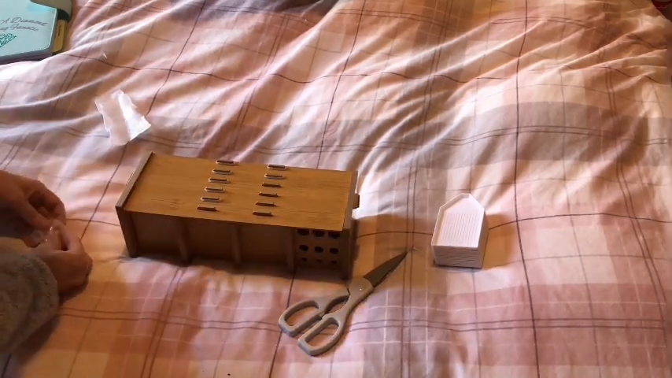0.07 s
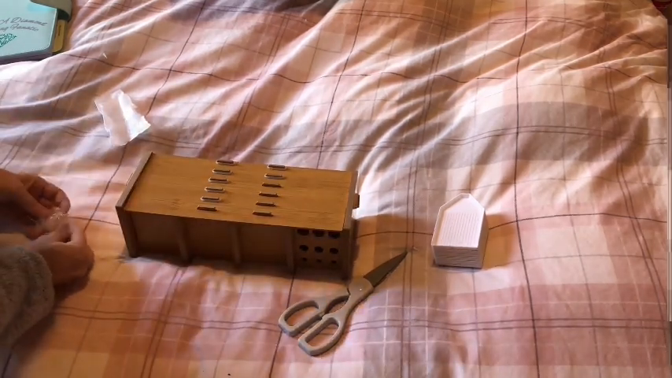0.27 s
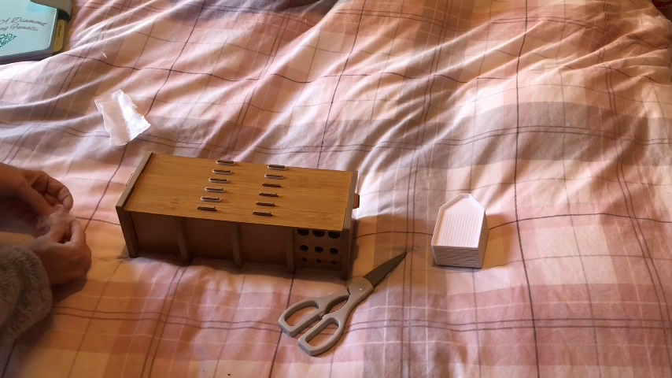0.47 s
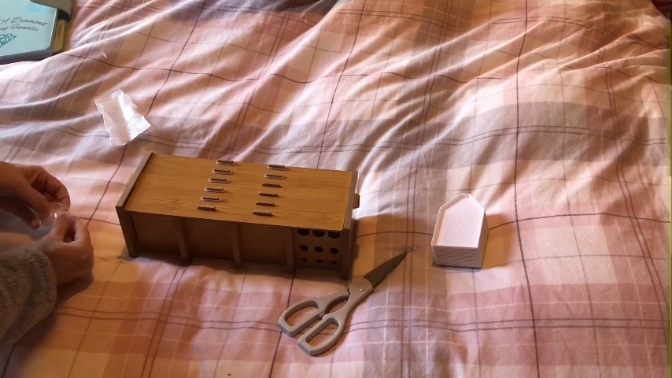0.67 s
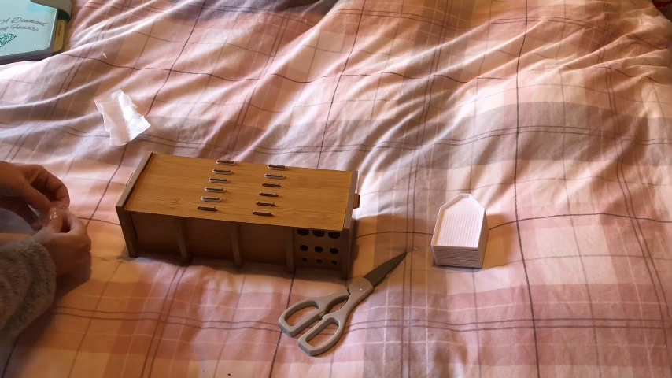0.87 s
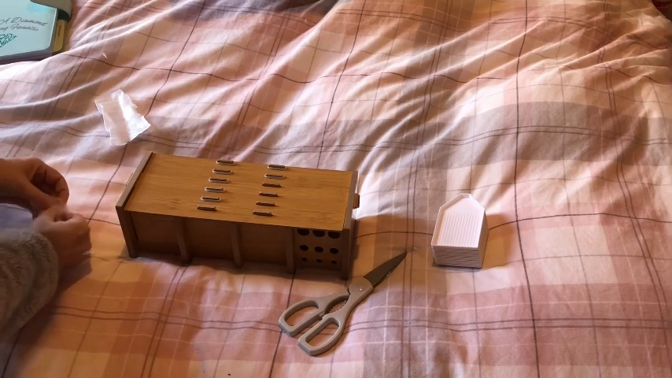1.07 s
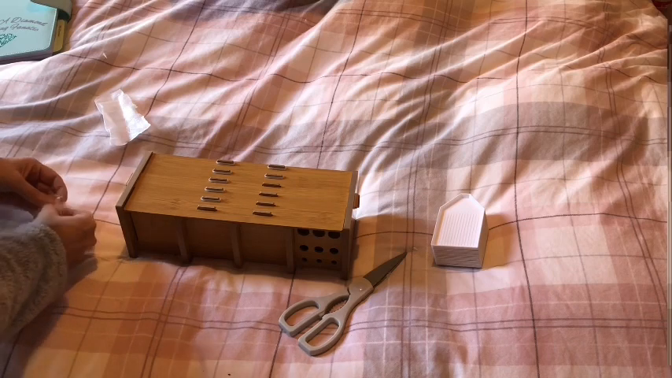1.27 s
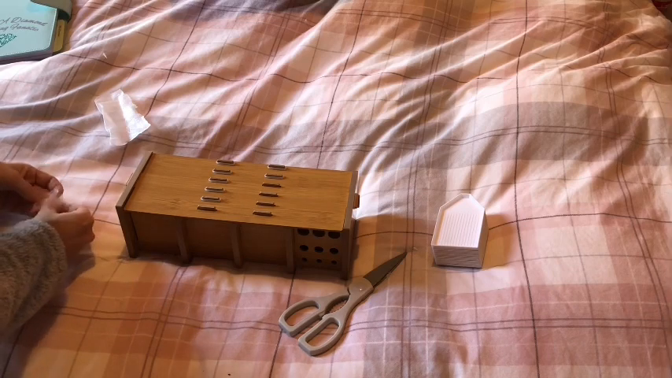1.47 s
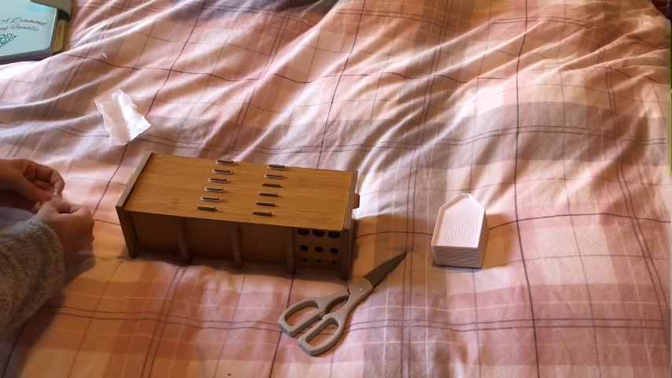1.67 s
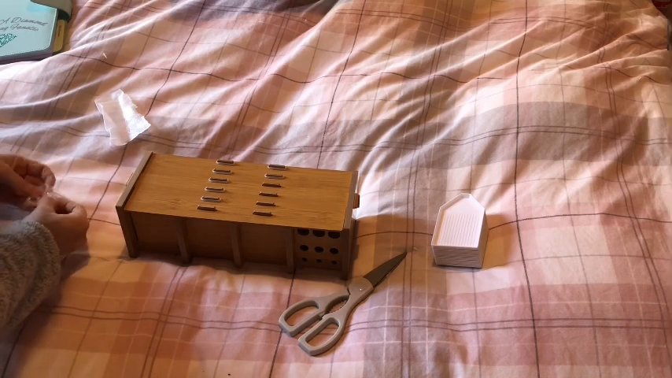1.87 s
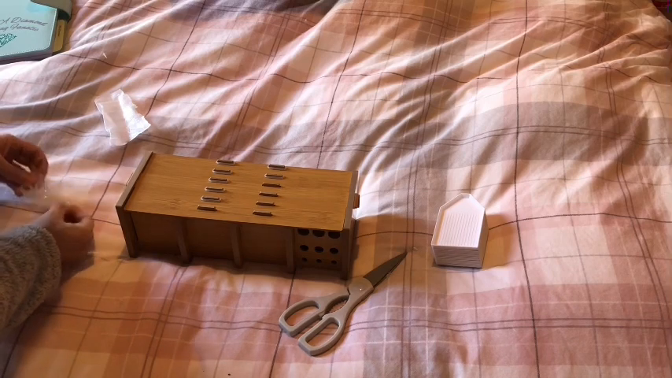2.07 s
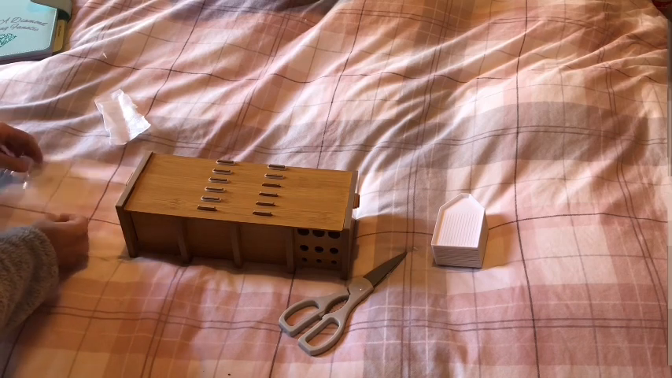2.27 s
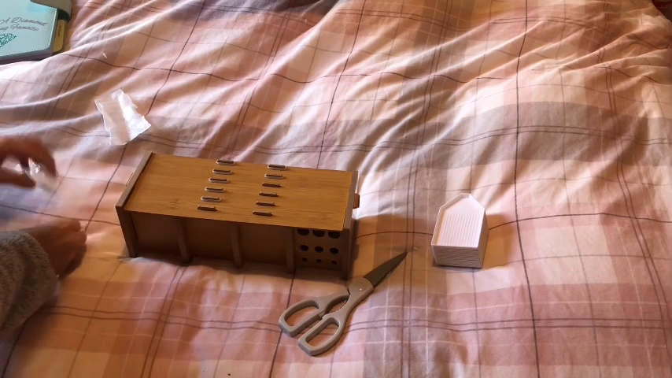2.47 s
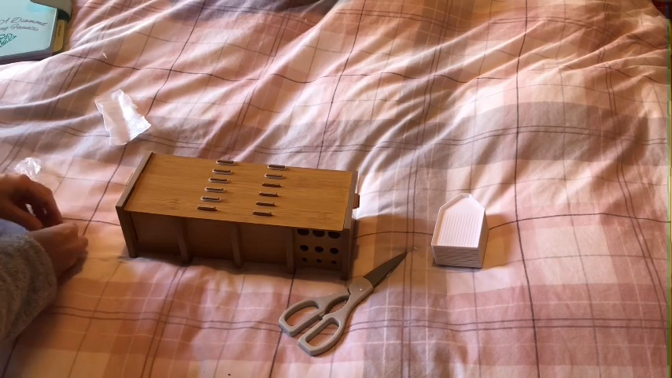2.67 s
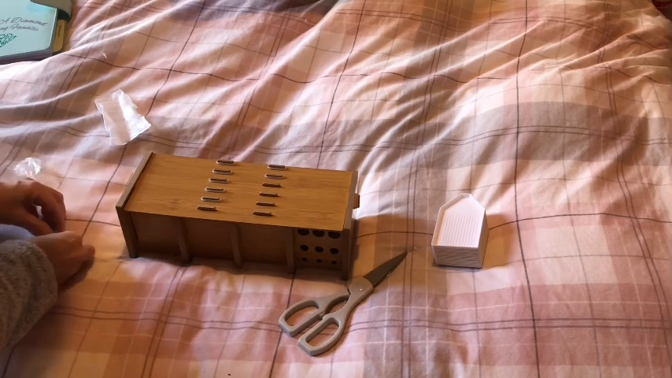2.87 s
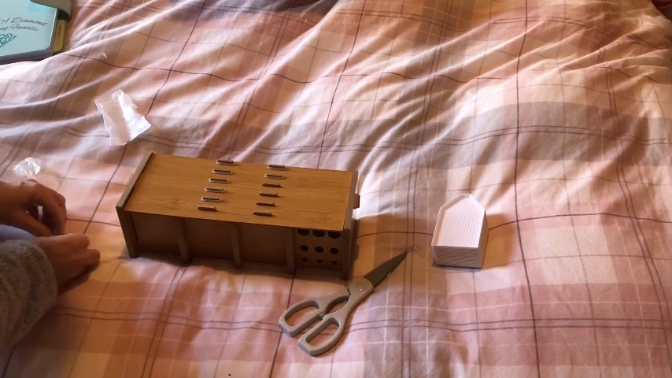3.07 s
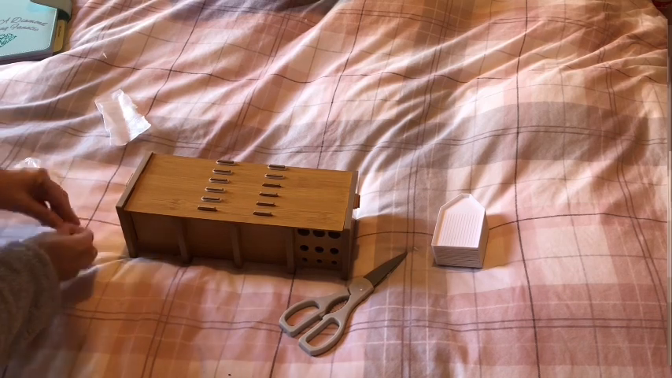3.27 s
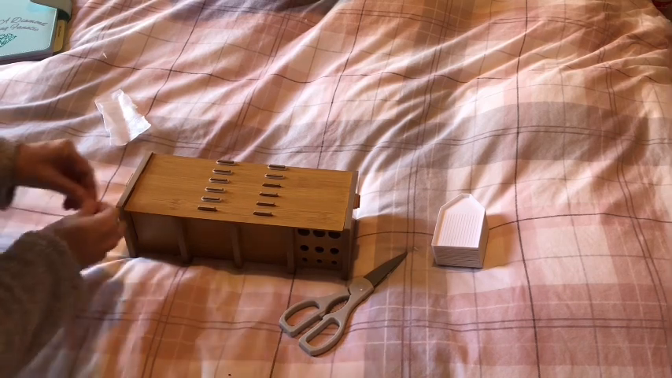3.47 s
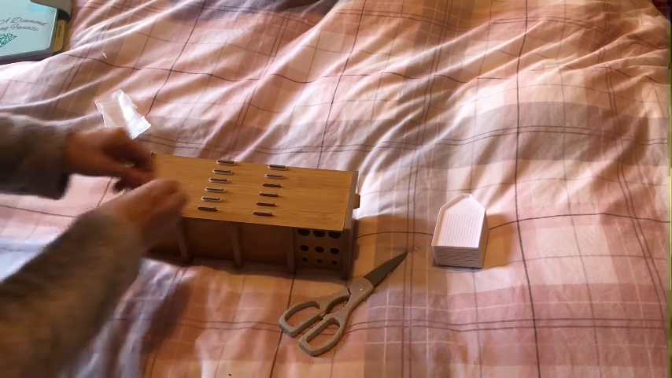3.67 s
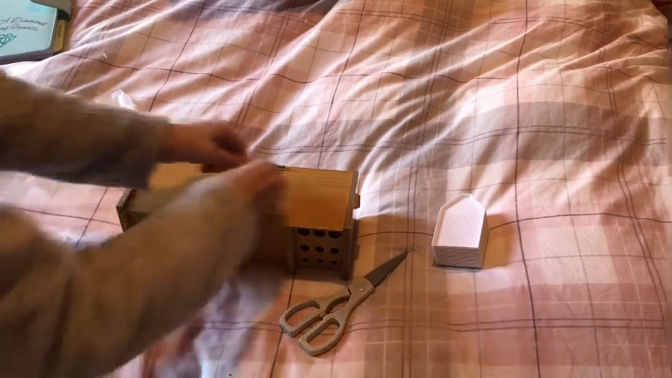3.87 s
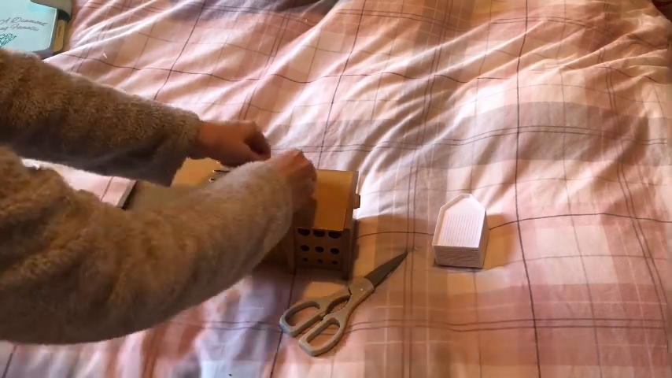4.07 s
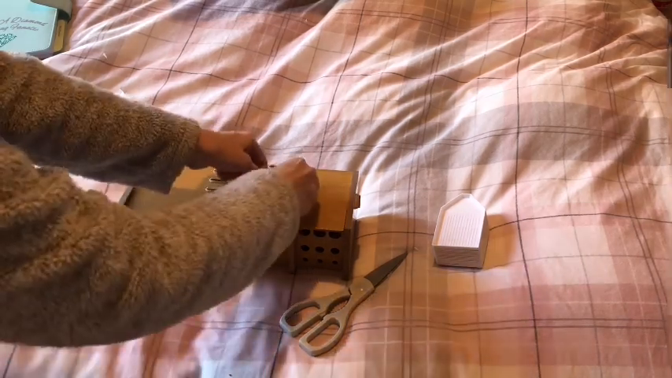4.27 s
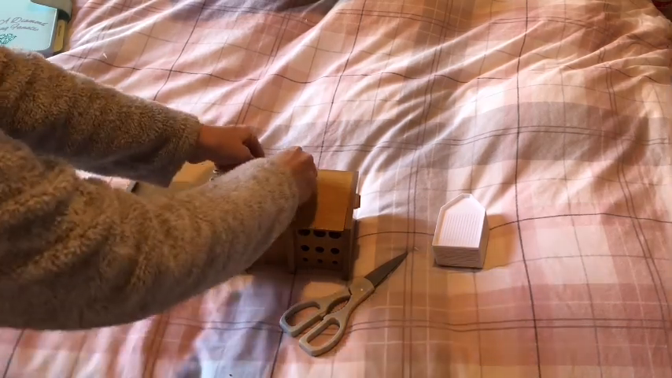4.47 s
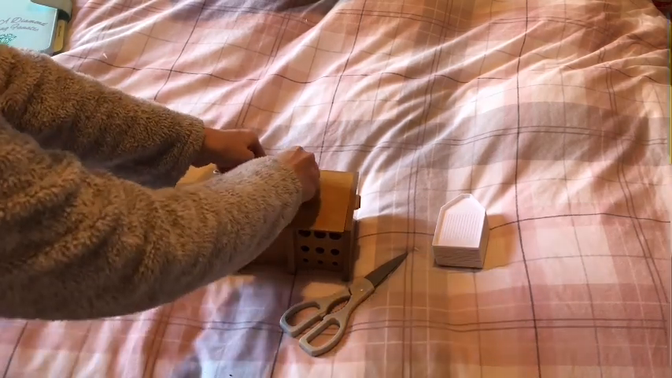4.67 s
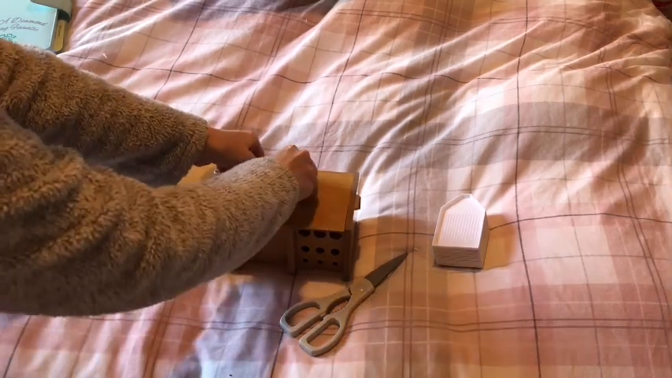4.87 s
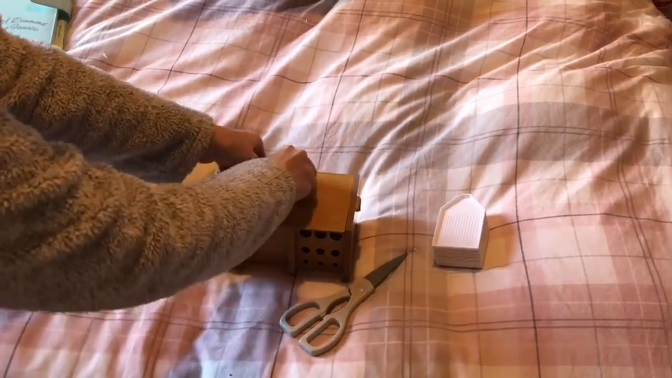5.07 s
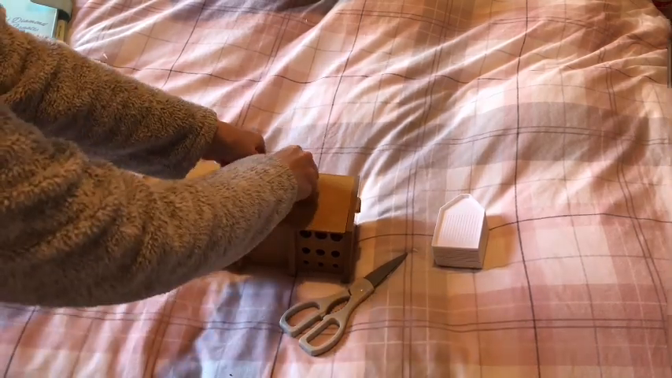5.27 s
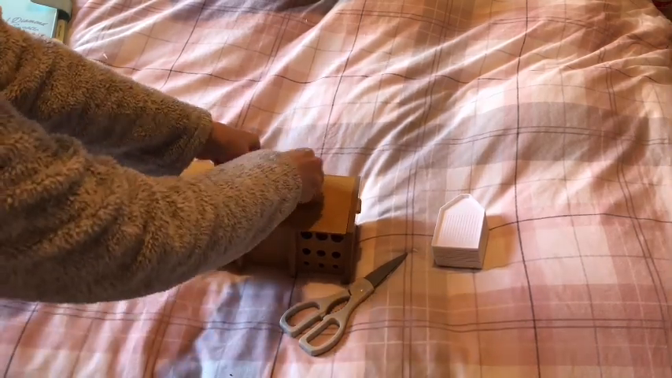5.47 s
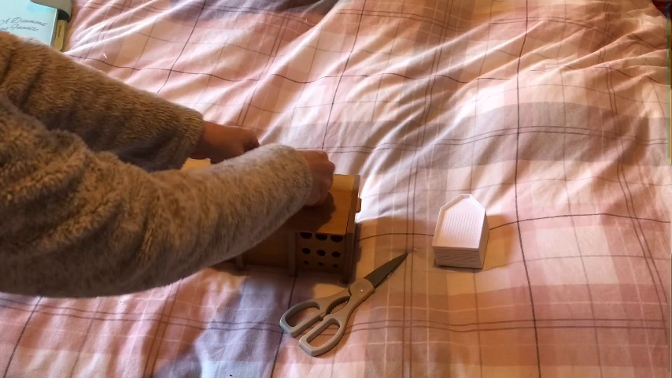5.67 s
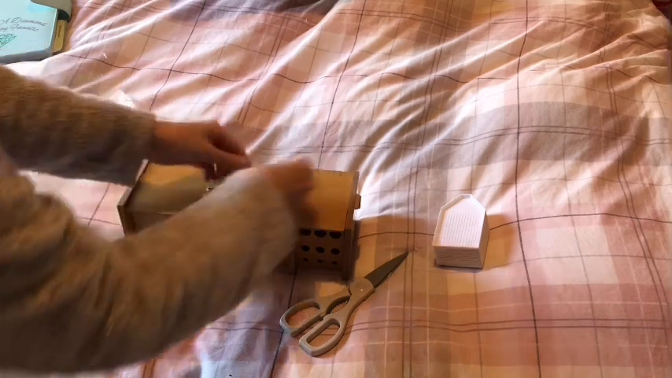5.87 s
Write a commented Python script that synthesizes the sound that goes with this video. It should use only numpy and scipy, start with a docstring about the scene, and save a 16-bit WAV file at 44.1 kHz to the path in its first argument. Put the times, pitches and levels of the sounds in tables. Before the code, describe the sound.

A thin plastic bag crackles sharply in a quiet bedroom, then after soft sleeve rustles and near silence a rubber band snaps hard on wood.

```python
"""In a faintly humming bedroom, hands first crumple a thin plastic bag on a bed: snapping creases
over a crackle of many small ticks. Soft knocks on a small plywood box begin, and wool sleeves brush the
cotton sheet with soft noise. Last, a rubber band stretched over the box slaps the wood and rattles against
it in several quick contacts, with a low twang and dull knocks after: short bursts of force that set off
the ringing of box and band. Bag and box echo in the room."""
import sys
import numpy as np
from scipy import signal
from scipy.fft import rfft, irfft
from scipy.io import wavfile
from scipy.ndimage import uniform_filter1d

SR = 44100
rng = np.random.default_rng(int(sys.argv[2]) if len(sys.argv) > 2 else 0)


def store_wav(level_fs):
    """Save 16-bit WAV to argv[1]."""
    pcm = np.round(np.clip(np.atleast_2d(level_fs), -1, 1) * 32767)
    wavfile.write(sys.argv[1], SR, pcm.T.astype(np.int16))


N = 261601  # length of the scene in samples


def gain_of(db):
    """Turns dB into a factor for the amplitude."""
    return 10 ** (np.asarray(db) / 20)


def evened(x):
    """Scales x to rms 1."""
    return x / np.sqrt(np.mean(x ** 2) + 1e-20)


def read(points, hz):
    """Reads a curve between its points, along a logarithmic frequency axis."""
    f, value = np.transpose(points)
    return np.interp(np.log(hz + 1), np.log(f + 1), value)


def add(mix, s, sound):
    """Adds a sound to the mix, starting at s seconds."""
    part = mix[round(s * SR):][:len(sound)]
    part += sound[:len(part)]


def coloured(x, spectrum):
    """Filters x by the dB curve, then scales it to rms 1."""
    hz = np.fft.rfftfreq(len(x), 1 / SR)
    return evened(irfft(rfft(x) * gain_of(read(spectrum, hz)), len(x)))


def ring(hz, cycles, phase, size=256):
    """A ring that grows for the given number of cycles and then dies away, peak near 1."""
    turns = np.arange(size) / SR * hz
    shape = turns / cycles * np.exp(1 - turns / cycles)
    return shape * np.sin(2 * np.pi * (turns + phase))


def tick(noise, ms):
    """A burst of noise with little bass, fading within about ms milliseconds, peak 1."""
    t = np.arange(len(noise) - 1) / SR
    less_bass = noise[1:] - .5 * noise[:-1]
    burst = less_bass * np.exp(-1000 * t / ms)
    return burst / abs(burst).max()


SWELL_DROP_DB = 12.5  # a swell lies this far under its peak one half length away


def swells(rows, order=2):
    """Gain at every sample: rounded swells whose powers add up, flatter on top for a higher order."""
    t = np.arange(N) / SR
    power = 0
    for s, db, half in rows:
        drop_db = SWELL_DROP_DB * abs((t - s) / half) ** order
        power = power + gain_of(2 * (db - drop_db))
    return np.sqrt(power)


# Colour of the steady noise. Each row: frequency in Hz, relative level in dB per Hz.
HUM_COLOUR = [(15, -62), (30, -22), (50, -12), (100, -6.5), (200, -9), (300, -11), (570, -19.5),
              (977, -23.5), (1630, -28.5), (4300, -33), (11700, -38.5), (15700, -35.5)]
# Low room resonances. Each row: frequency in Hz, width in Hz, relative level in dB.
DRONES = [(63.3, 2.8, -5), (158.9, 5.7, -4), (241.6, 24, -11.5)]
# Faint electronic tones. Each row: frequency in Hz, level in dB rms.
WHINE = [(12996, -87), (13997, -87), (14997, -83)]
HUM_DB = -51  # rms of the steady noise
DRONE_DB, WAVER_DB, WAVER_S = -52, 3.5, .25  # the low drones swell and fade by chance


def hum():
    """Steady room and microphone noise, wavering low drones and a faint whine."""
    t, drones = np.arange(N) / SR, np.zeros(N)
    for hz, width, db in DRONES:
        # slow random changes of strength and phase give each drone its width
        memory = np.exp(-np.pi * width / SR)
        slow = signal.lfilter([1], [1, -memory], rng.standard_normal((2, N)))
        turn = 2 * np.pi * hz * t
        drones += gain_of(db) * evened(slow[0] * np.cos(turn) + slow[1] * np.sin(turn))
    drones = signal.lfilter(*signal.butter(2, (45, 350), "band", fs=SR), drones)
    waver = evened(uniform_filter1d(rng.standard_normal(N), round(WAVER_S * SR)))
    drones *= gain_of(DRONE_DB + WAVER_DB * waver)
    whine = sum(gain_of(db) * np.sqrt(2) * np.sin(2 * np.pi * hz * t) for hz, db in WHINE)
    steady = gain_of(HUM_DB) * coloured(rng.standard_normal(N), HUM_COLOUR)
    return steady + drones + whine


# How long the echo lasts. Each row: frequency in Hz, time in seconds to fade by 60 dB.
ROOM = [(250, 0.19), (1000, 0.32), (4000, 0.21), (12000, 0.25)]


def bedroom(x):
    """Sparse reflections of random sign, each band dying at its own speed."""
    taps = np.zeros(SR // 2)
    at = np.arange(80, len(taps) - 20, 20)
    at = at + rng.integers(0, 20, len(at))
    taps[at] = rng.choice([-1., 1.], len(at))
    hz, t, bands = signal.stft(taps, SR, nperseg=128)
    fade = gain_of(-60 * t / read(ROOM, hz)[:, None])
    tail = signal.istft(bands * fade, SR, nperseg=128)[1]
    return signal.fftconvolve(x, tail / np.linalg.norm(tail))[:N]


# Colour of wool rubbing on cotton. Each row: frequency in Hz, relative level in dB per Hz.
CLOTH = [(300, -13), (1000, -4), (3000, -7), (8000, -9.5), (15700, -23)]
# Strokes of the sleeves. Each row: middle in seconds, level in dB, half length in seconds,
# extra treble in dB.
STROKES = [(2.748, -58, 0.16, 2), (2.96, -58.5, 0.063, 0), (3.037, -53.5, 0.036, -3),
           (3.155, -55.5, 0.086, 1), (3.85, -65.5, 0.2, 1.5), (5.23, -62, .05, -4), (5.6, -60, 0.15, 1.5),
           (5.719, -61, 0.053, 7), (5.86, -60.5, 0.16, -9)]
FIBRE_HZ = 7000  # the treble of a stroke starts here


def sleeves():
    """Soft fibre friction: noise with a slightly grainy surface; each stroke has its own treble."""
    grain = evened(uniform_filter1d(rng.standard_normal(N), 150))
    rub = coloured(rng.standard_normal(N) * gain_of(1.7 * grain), CLOTH)
    treble = signal.filtfilt(*signal.butter(2, FIBRE_HZ, "high", fs=SR), rub)
    plain = [(s, db, half) for s, db, half, _ in STROKES]
    bright = [(s, db + extra_db, half) for s, db, half, extra_db in STROKES]
    return (rub - treble) * swells(plain, order=4) + treble * swells(bright, order=4)


# Colour of the small crackle. Each row: frequency in Hz, relative level in dB per Hz.
FILM = [(250, -36), (500, -4.5), (1000, -3), (2000, -2), (4500, 3), (7000, 0), (10000, -7.5), (15700, -6)]
# Squeezes of the bag, each a swell of small crackle. Each row: peak in seconds, level in dB,
# half length in seconds.
SQUEEZES = [(.02, -46.5, 0.059), (.16, -41, 0.14), (.281, -37.5, 0.029), (.4, -41, 0.064),
            (.489, -38.5, .05), (.655, -34.5, 0.086), (.856, -42.5, 0.078), (1.01, -48, 0.13),
            (1.24, -45, 0.11), (1.42, -41.5, 0.038), (1.525, -49.5, 0.078), (1.71, -39.5, 0.058),
            (1.91, -35.5, 0.058), (1.99, -42, 0.035), (2.1, -54.5, .06), (2.26, -46, 0.088),
            (2.36, -50.5, 0.054), (2.48, -55, 0.063)]
CRACKLES_PER_S, CRACKLE_SPREAD_DB = 1200, 5  # average rate, and how much the sizes differ


def crackle():
    """Countless small creases of many sizes, in clumps, each a tick with a faint ring of its own."""
    clumps = evened(uniform_filter1d(rng.standard_normal(N), 500))
    chance = np.minimum(rng.exponential(1, N), 3)
    size = gain_of(CRACKLE_SPREAD_DB * chance + 2 * clumps)
    size *= rng.random(N) < CRACKLES_PER_S / SR  # only a few samples hold a crackle
    facet, out, t = rng.integers(0, 24, N), np.zeros(N), np.arange(256) / SR
    for k, hz in enumerate(np.geomspace(1500, 14000, num=24)):
        click = rng.standard_normal(256) * np.exp(-t / 0.00048)
        grain = evened(click) + 0.72 * evened(ring(hz, 1.6, rng.random()))
        out += signal.oaconvolve(size * (facet == k), grain)[:N]
    return coloured(out, FILM) * swells(SQUEEZES)


# Creases of the bag that snap clearly. Each row: start in seconds, level of the main ring in dB,
# pitch of that ring in Hz.
SNAPS = [(0.013, -31, 8000), (0.0355, -34, 5400), (0.0657, -22, 4570), (0.0881, -22, 4730),
         (0.103, -20, 6250), (0.1112, -19.5, 4600), (0.1267, -24, 6000), (0.138, -19, 8100),
         (0.1543, -21, 3700), (0.1625, -13, 7250), (0.1795, -20, 5100), (0.1849, -18, 6300),
         (0.2202, -26, 3040), (0.229, -23, 12500), (0.2554, -22, 3950), (0.267, -22.5, 4470),
         (0.2833, -24, 3320), (0.291, -19, 11000), (0.2998, -31, 5400), (0.3321, -18, 3900),
         (0.347, -23, 8900), (0.3517, -17.5, 4850), (0.3708, -23.5, 2670), (0.3903, -22, 4430),
         (0.41, -27, 12600), (0.4264, -23, 5500), (0.4325, -25, 5670), (0.4751, -19, 6300),
         (0.4974, -21.5, 2150), (0.571, -17, 4930), (0.6169, -20.5, 3500), (0.6208, -21, 6300),
         (0.63, -27, 6040), (0.6444, -19.5, 4700), (0.65, -12.5, 4970), (0.6656, -22, 5700),
         (0.6755, -24, 4030), (0.6925, -21.5, 5450), (0.7673, -17, 5250), (0.84, -26.5, 5100),
         (0.8536, -16.5, 4100), (0.959, -20.5, 5700), (1.01, -23.5, 2750), (1.059, -23, 5240),
         (1.167, -23.5, 4950), (1.1851, -21.5, 4500), (1.2218, -20.5, 6860), (1.2687, -25, 5200),
         (1.3387, -26.5, 3350), (1.35, -18.5, 4300), (1.3929, -25, 5400), (1.4928, -27.5, 5330),
         (1.6356, -30.5, 5930), (1.6669, -38, 4830), (1.6858, -15.5, 2330), (1.7399, -16, 4800),
         (1.7467, -12.5, 3530), (1.7575, -22, 6000), (1.8434, -25.5, 4040), (1.8798, -18.5, 9150),
         (1.894, -19, 5940), (1.9279, -21.5, 2220), (1.9347, -23.5, 5100), (1.9886, -28.5, 4300),
         (2.0829, -21, 7400), (2.2057, -21.5, 8150), (2.2497, -30, 3570), (2.2668, -21, 4250),
         (2.3436, -27, 4370), (2.4634, -38, 4300), (2.9198, -42, 2480), (3.0254, -32, 3760)]
EDGE_DB, EDGE_SPREAD_DB = -6, 19  # bright edge of a snap beside its ring: middle and range of chance


def snaps():
    """A crease flips in two quick steps: the facet rings briefly, neighbours answer, the edge ticks."""
    out = np.zeros(N)
    chance, noise = rng.random((len(SNAPS), 7)), rng.standard_normal((len(SNAPS), 257))
    for (s, db, hz), c, z in zip(SNAPS, chance, noise):
        facet = ring(hz, .8, c[0])
        larger = gain_of(-13) * ring(hz * (.4 + .4 * c[1]), .45, c[2])
        smaller = gain_of(-2.5) * ring(hz * (1.32 + 0.84 * c[3]), 0.74, c[4])
        edge_db = EDGE_DB + EDGE_SPREAD_DB * (c[6] - .5)
        edge = gain_of(edge_db) * np.roll(tick(z, .4), 8)  # 8 samples after the rings start
        flip = gain_of(db) * (facet + larger + smaller + edge)
        add(out, s, flip)
        # the second step is weaker and pushes the other way
        add(out, s + .0003 + .0008 * c[5], -gain_of(-9) * flip)
    return out


# Ways the box and the stretched band ring. Each row: frequency in Hz, peak in dB over the bare slap
# at full level, time in seconds to fade by 60 dB.
MODES = [(94, 11.5, 0.11), (280, 10.5, 0.17), (391, 10, 0.065), (543, 13.5, 0.023), (783, 8.5, 0.018),
         (1006, 14.5, 0.011), (1338, 11, 0.016), (1840, 7.5, 0.0058), (2230, 9.5, 0.0058),
         (2920, 7.5, 0.014), (3320, 15, 0.0046), (4300, 17, 0.011), (5100, 10, .008), (6000, 8, 0.009),
         (7360, 9, 0.0029), (8900, 2.5, 0.0036)]
BODY_DB = 11.5  # gain of the slap and the ringing together


def body(size=16384):
    """Response of box and band to one contact: powers of slap and modes add up, the phase is causal."""
    hz = abs(np.fft.fftfreq(size, 1 / SR))
    power = 1e-3 + hz ** 2 / (hz ** 2 + 900 ** 2)  # the bare slap: a small contact radiates little bass
    for f, db, t60 in MODES:
        off_pitch = 2 * np.pi * (hz - f) * t60 / np.log(1000)
        power += gain_of(2 * db) / (1 + off_pitch ** 2)
    # the Hilbert transform finds the phase that lets no sound come before the contact
    response = np.exp(np.conj(signal.hilbert(np.log(power) / 2)))
    return gain_of(BODY_DB) * np.fft.ifft(response).real[:size // 2]


# Contacts on the box, and at 5.393 s the low twang of the band, made the same way. Each row: start in
# seconds, strength in dB, hardness as top frequency in Hz, rattle length in milliseconds.
CONTACTS = [(2.17, -43, 1310, 0.85), (3.264, -45, 1210, 1.9), (5.3612, -11, 8840, 3.2),
            (5.377, -23.5, 4000, 1.9), (5.393, -24, 151, 5.5), (5.4207, -14, 11900, 1.77),
            (5.429, -32, 14000, 1), (5.544, -35.5, 790, 6.8), (5.756, -47, 1010, 6)]


def box_and_band():
    """Each row is one firm push and a short rattle, duller for a lower top frequency, that starts the ringing."""
    force, t = np.zeros(N), np.arange(2048) / SR
    noise = rng.standard_normal((len(CONTACTS), len(t)))
    for (s, db, top_hz, ms), z in zip(CONTACTS, noise):
        push = z * np.exp(-(1000 * t / ms) ** 2)
        push[0] = .35 * np.sign(z[0]) * np.linalg.norm(push)  # the firm start
        push = signal.lfilter(*signal.butter(2, min(top_hz, .45 * SR), fs=SR), push)
        add(force, s, gain_of(db) * push / np.linalg.norm(push))
    sound = signal.oaconvolve(force, body())[:N]
    return signal.lfilter(*signal.butter(2, 70, "high", fs=SR), sound)  # a small box radiates no deep bass


BAG_ROOM_DB, BOX_ROOM_DB = -8.5, -5.5  # how strongly bag and box feed the echo


def scene():
    """Adds up bag, box and band, their echo, sleeves and hum, as one channel."""
    bag, wood = snaps() + crackle(), box_and_band()
    echo = bedroom(gain_of(BAG_ROOM_DB) * bag + gain_of(BOX_ROOM_DB) * wood)
    return (bag + wood + echo + sleeves() + hum())[None]


EDGE_HZ = 15900  # the highest treble ends around here


def record(dry):
    """The band limit of the recorder: a steep filter that takes away the highest treble."""
    low_pass = signal.firwin(511, EDGE_HZ, window=("kaiser", 9), fs=SR)
    return signal.oaconvolve(dry, low_pass[None], "same")


dry = scene()
out = record(dry)
store_wav(out)
```